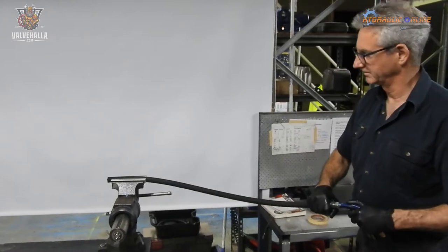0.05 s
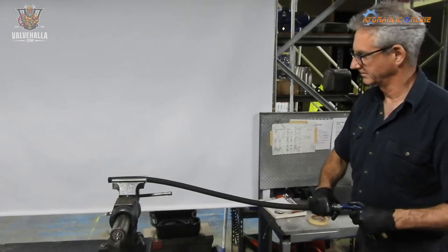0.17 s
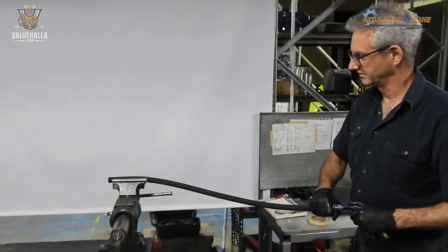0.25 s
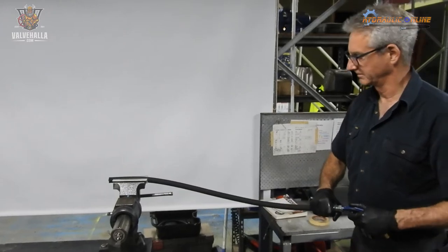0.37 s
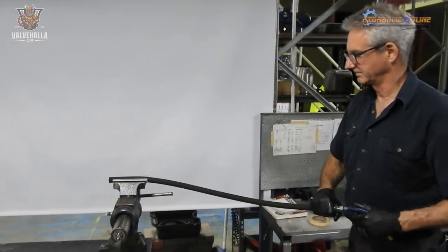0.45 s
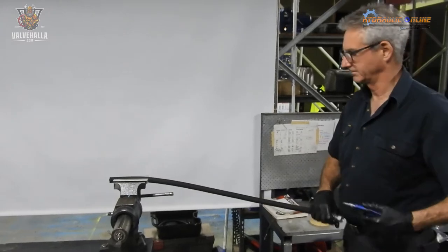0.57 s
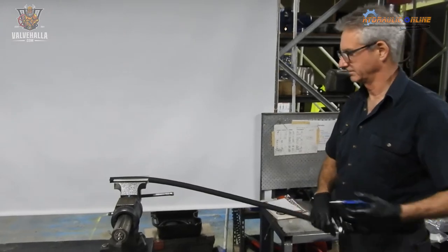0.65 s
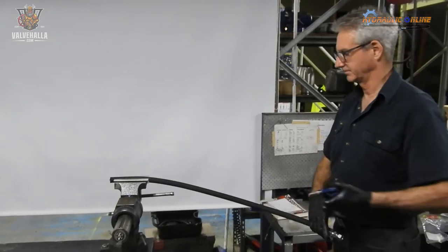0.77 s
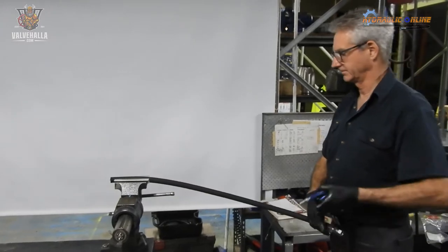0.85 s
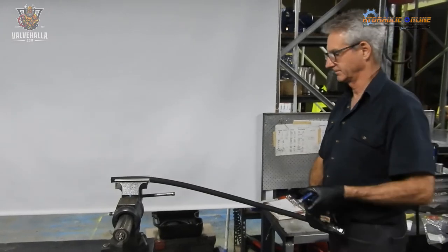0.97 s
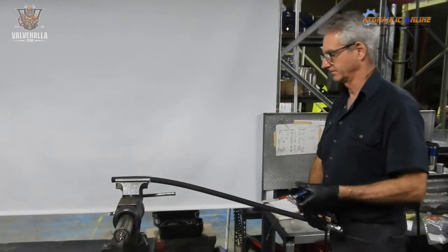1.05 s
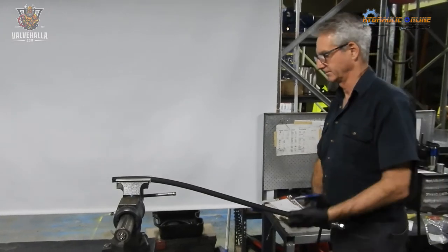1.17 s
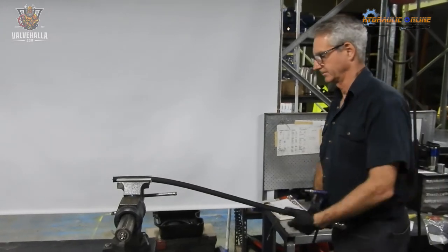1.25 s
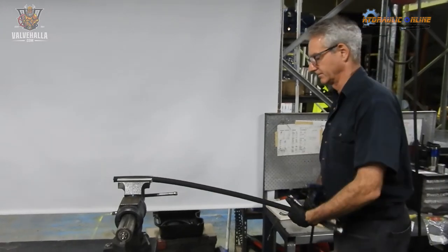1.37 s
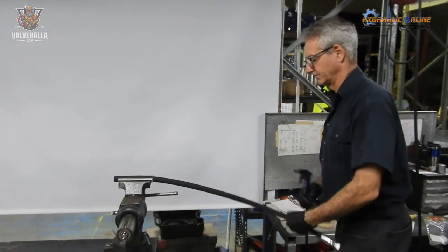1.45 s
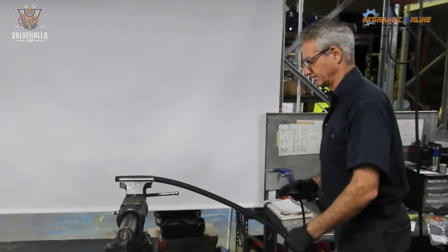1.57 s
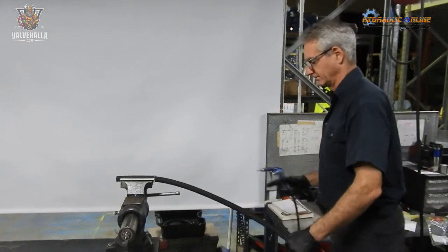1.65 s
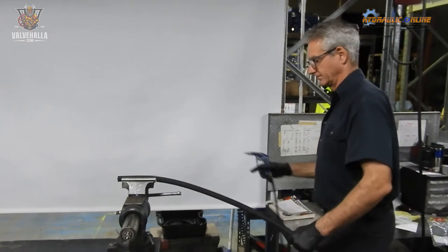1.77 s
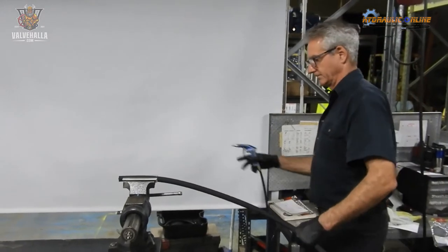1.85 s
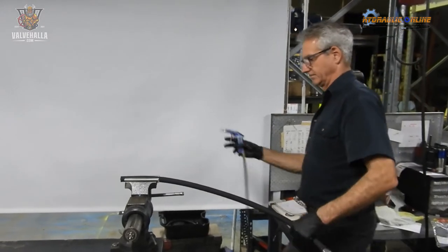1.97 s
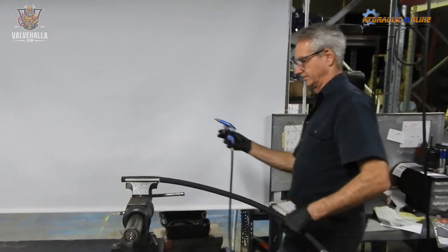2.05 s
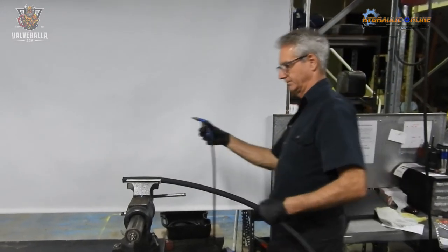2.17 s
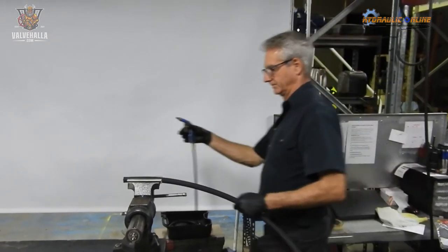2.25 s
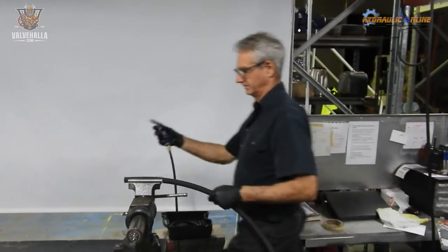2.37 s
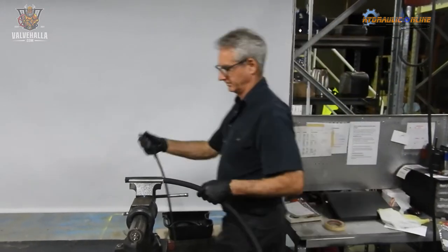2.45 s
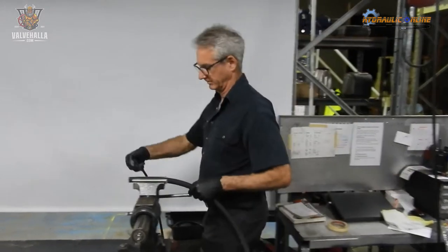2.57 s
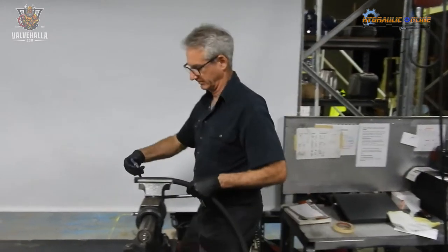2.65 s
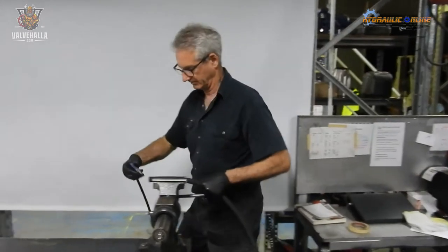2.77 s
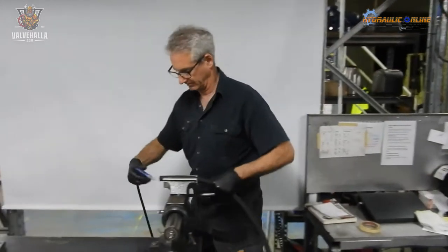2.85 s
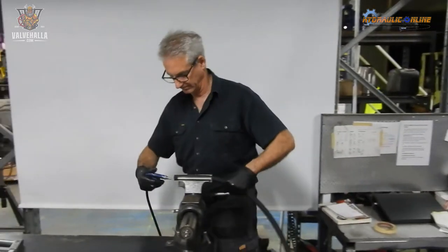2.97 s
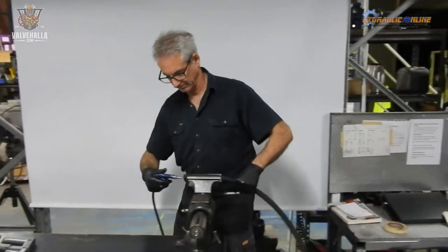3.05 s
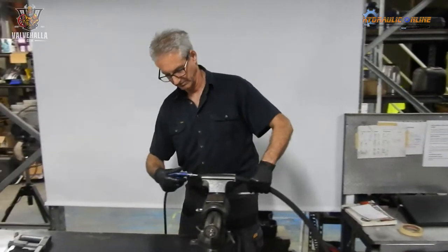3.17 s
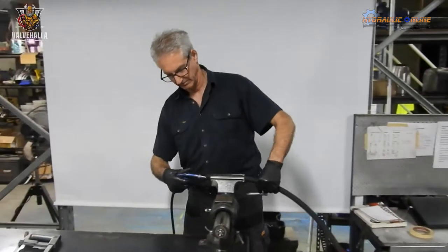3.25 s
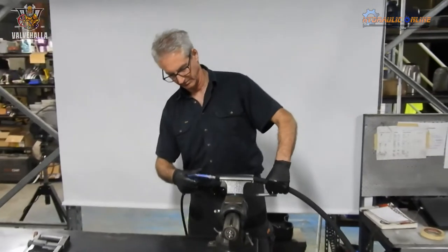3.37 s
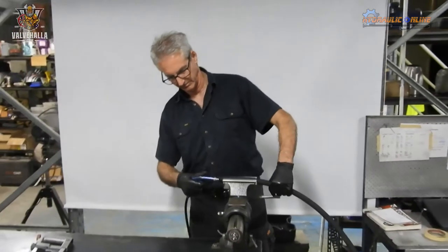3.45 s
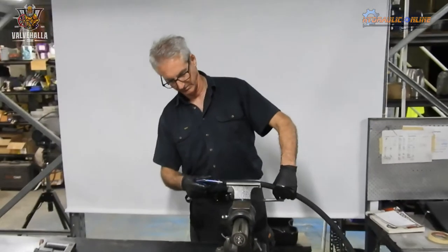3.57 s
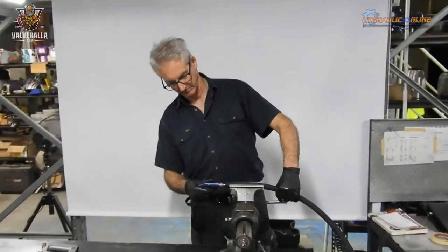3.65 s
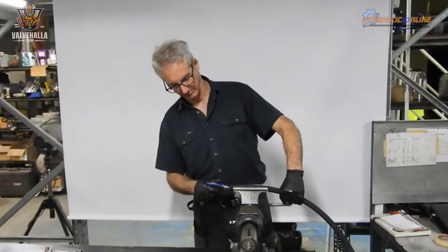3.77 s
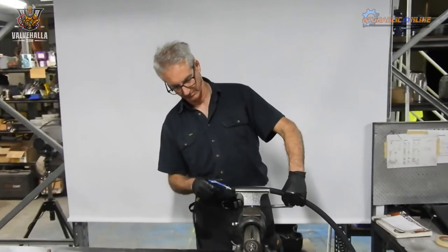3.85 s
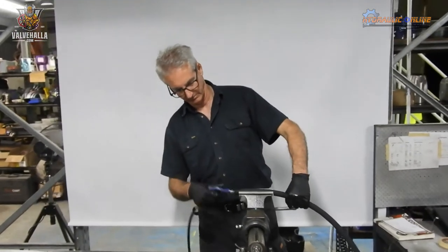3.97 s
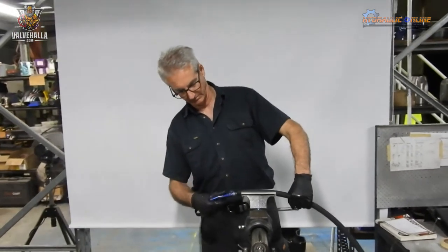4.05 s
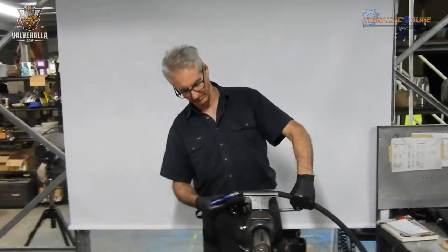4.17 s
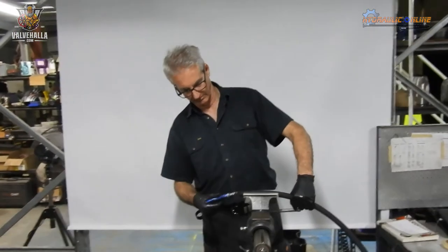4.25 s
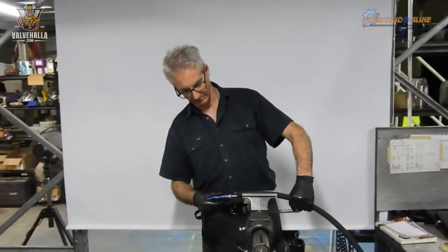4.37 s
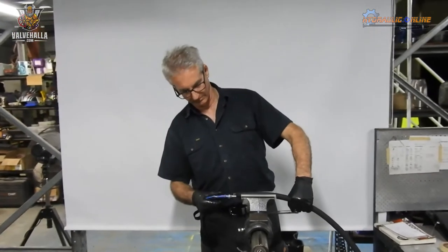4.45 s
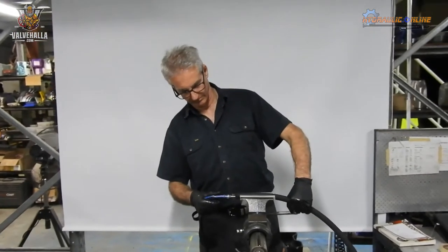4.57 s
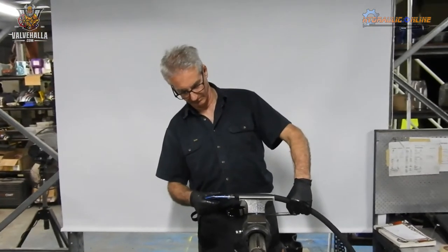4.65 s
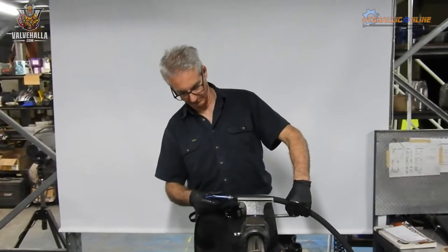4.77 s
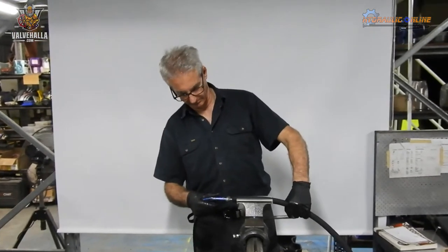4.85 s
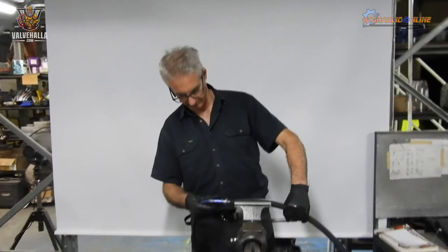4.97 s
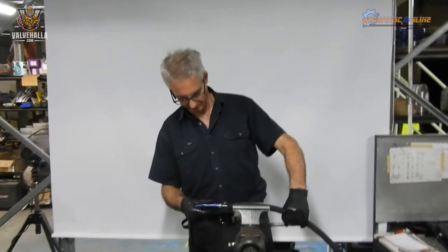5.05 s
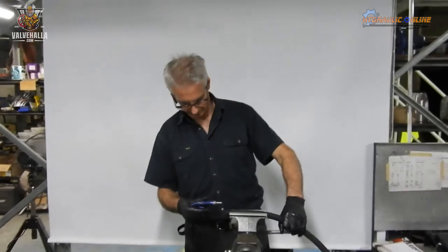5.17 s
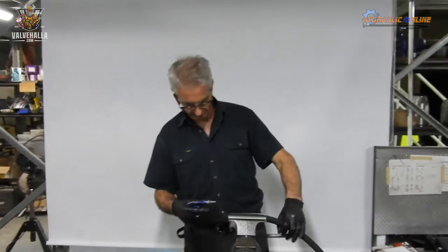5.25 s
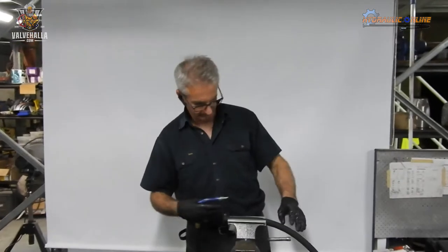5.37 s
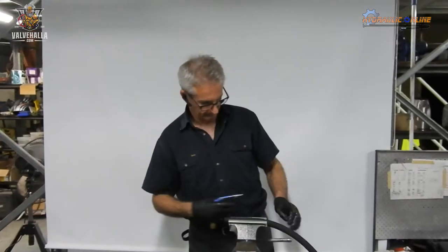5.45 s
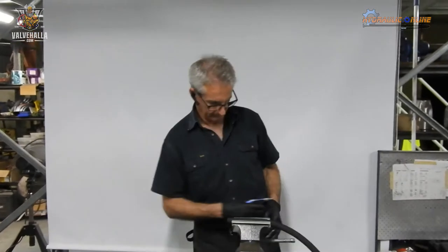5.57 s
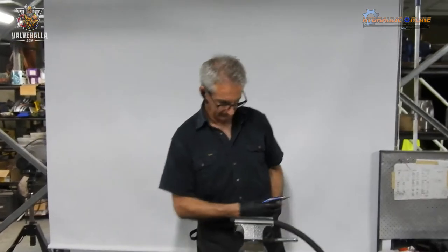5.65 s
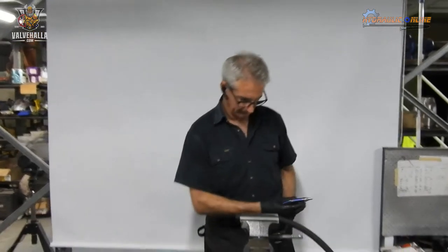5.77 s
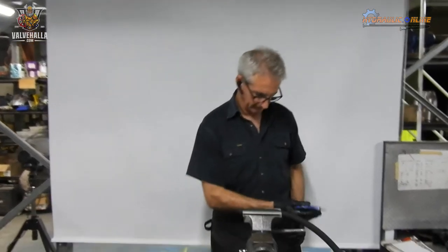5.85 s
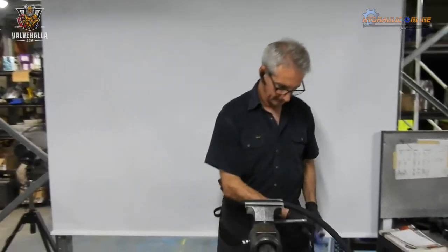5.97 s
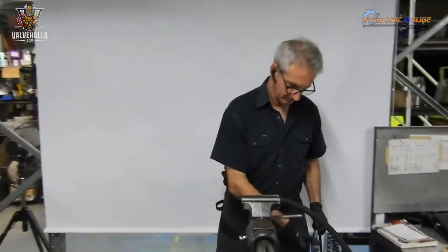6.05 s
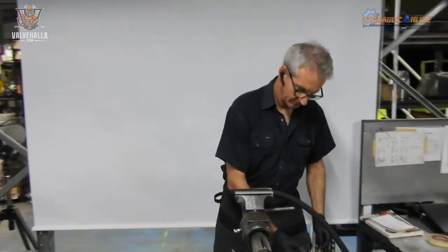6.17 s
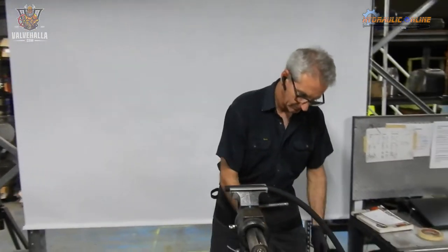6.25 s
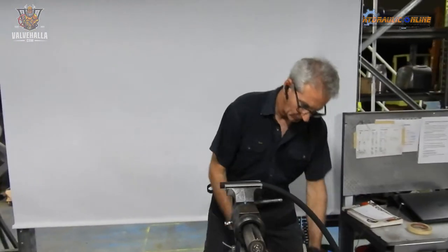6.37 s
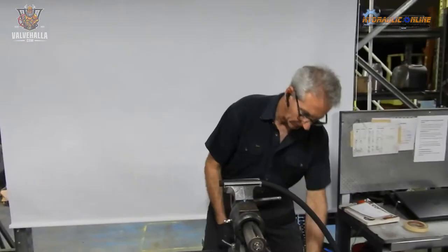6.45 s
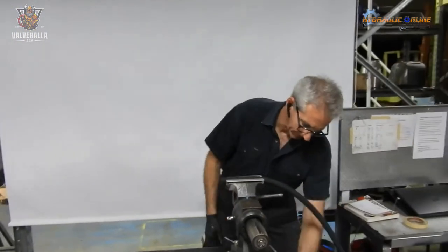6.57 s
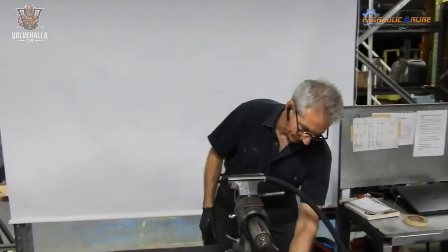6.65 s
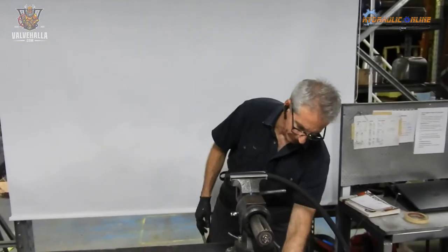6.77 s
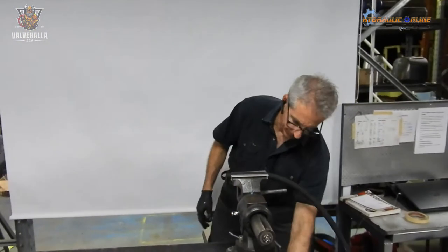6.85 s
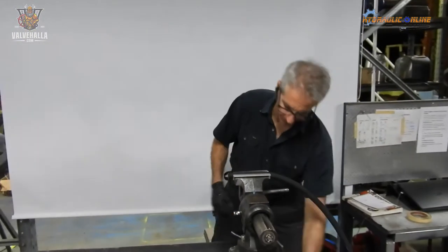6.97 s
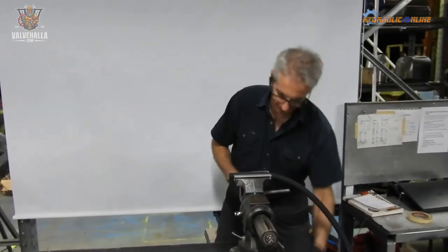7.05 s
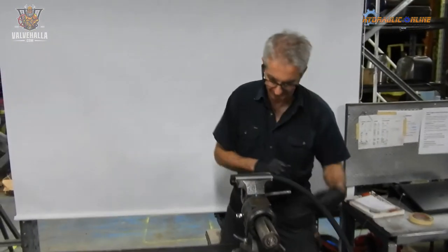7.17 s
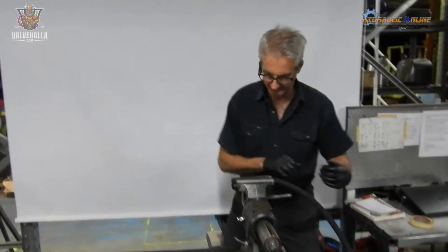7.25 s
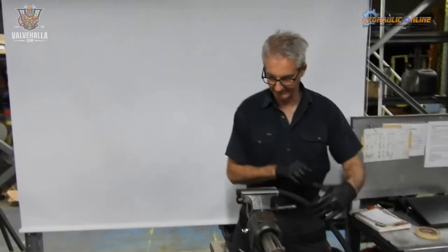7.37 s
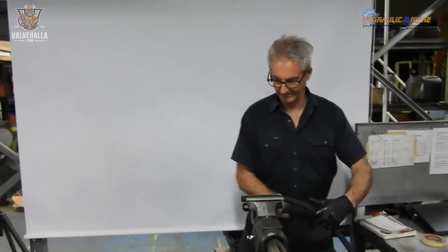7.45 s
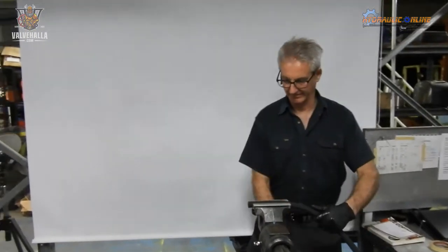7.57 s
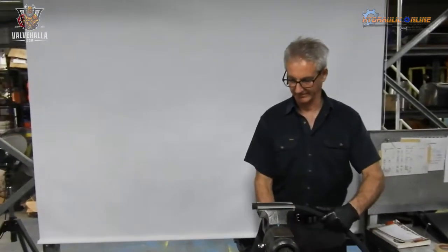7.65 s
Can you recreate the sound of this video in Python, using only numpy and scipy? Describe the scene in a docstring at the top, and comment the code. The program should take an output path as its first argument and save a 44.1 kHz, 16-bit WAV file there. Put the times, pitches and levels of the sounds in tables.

```python
"""Large workshop: a blow gun is fired in long blasts into a cut rubber hose clamped in a vice.
Shaped noise makes the jet's hiss, the ringing hose air column, the rim shriek and the off-bore buffet.
Between blasts the gun leaks and clicks (gated noise); the hose end knocks and the vice stand booms
(decaying sines), and rubber slides and scrapes (resonant noise).
Clothes rustle, feet shuffle over the hum of the hall, and decaying noise tails give its echo."""
import sys
import numpy as np
from scipy import signal
from scipy.fft import rfft, irfft, next_fast_len
from scipy.io import wavfile
from scipy.ndimage import uniform_filter1d

SR = 44100
rng = np.random.default_rng(int(sys.argv[2]) if len(sys.argv) > 2 else 0)


def log_audio(samples):
    """Write samples as a 16-bit WAV file to the path given in sys.argv[1]."""
    # one column per channel
    frames = np.atleast_2d(samples).T
    # limit to full scale, then quantise
    limited = np.clip(frames, -1, 1)
    pcm = np.round(limited * 32767).astype(np.int16)
    wavfile.write(sys.argv[1], SR, pcm)


N = 340452
T = np.arange(N) / SR
SIZE = next_fast_len(N, True)
F = np.maximum(np.fft.rfftfreq(SIZE, 1 / SR), 1)


def undb(db):
    """Decibels to gain."""
    return np.exp(np.asarray(db) * (np.log(10) / 20))


def unit(x):
    """Scale to rms 1."""
    return x / np.sqrt(np.mean(np.abs(x) ** 2))


def curves(rows):
    """Columns of a table, linearly interpolated over time."""
    t_s, *columns = np.transpose(rows)
    return [np.interp(T, t_s, c) for c in columns]


def colour(points):
    """Gain over F from (f/Hz, level/dB) points, linear in dB over log frequency."""
    hz, db = np.transpose(points)
    return undb(np.interp(np.log(F), np.log(hz), db))


def band(lo_hz, hi_hz, order=12):
    """Band-pass gain with Butterworth-shaped skirts."""
    highpass = 1 + (lo_hz / F) ** (2 * order)
    lowpass = 1 + (F / hi_hz) ** (2 * order)
    return 1 / np.sqrt(highpass * lowpass)


def resonant(bed, modes, ring_db, spread=0.45, max_q=260):
    """Broad spectrum plus resonance peaks; losses cap the Q so peaks never get whistle-thin."""
    peaks, f = np.zeros(len(F), np.float32), F.astype(np.float32)
    for hz, width_hz, db in np.float32(modes):
        damped_hz = np.hypot(width_hz, hz / max_q)
        power = np.float32(undb(2 * db) * width_hz / damped_hz)
        detune = (f - hz) / np.float32(spread * damped_hz)
        peaks += power / (1 + detune ** 2) ** 2
    return np.sqrt(unit(bed) ** 2 + peaks / peaks.mean() * undb(2 * ring_db))


# stereo width, side re mid: f/Hz, level/dB
WIDTH_POINTS = [(60, -16.5), (300, -8), (1000, -9), (2000, -8), (5000, -7), (9000, -3), (14000, -1.5)]


def noise(gain):
    """Stereo turbulence of a given spectrum, rms 1, wider in the treble."""
    draws = rng.standard_normal((2, 2 * len(F)), dtype=np.float32).view(np.complex64)
    mid, side = draws * gain.astype(np.float32)
    side = side * undb(np.interp(F, *np.transpose(WIDTH_POINTS))).astype(np.float32)
    return unit(irfft(np.array([mid + side, mid - side]), SIZE)[:, :N])


def walk(rate_hz):
    """Smooth random wander, spread near 1."""
    k = max(int(SR / rate_hz), 1)
    held = np.repeat(rng.standard_normal(N // k + 1), k)[:N]
    return 1.1 * uniform_filter1d(held, k)


def gate(start_s, length_s, t60_s, rise_s=.002):
    """Linear rise, hold, then exponential decay."""
    end_s = start_s + length_s
    opening = np.interp(T, [start_s, start_s + rise_s], [0, 1])
    return opening * undb(np.interp(T, [end_s, end_s + 3 * t60_s], [0, -180]))


def bend(x, octaves):
    """Shift all frequencies of a steady stereo sound along a curve by varying the read speed."""
    read_s = np.cumsum(2 ** octaves) / SR % T[-1]
    return np.array([np.interp(read_s, T, c) for c in x])


# blasts A, B (clamped end) and C (new aim)
# jet spectra: f/Hz, level/dB
JET_FREE_END = [(1650, -45), (2800, -18), (3090, -13), (4060, -11.5), (4870, -5), (6350, -8.5), (9010, 2.5),
                (11400, -13.5), (12700, -16.5), (14900, -34)]
JET_CLAMPED_END = [(1650, -44), (2800, -19.5), (3680, -14.5), (4200, -12.5), (4770, -10), (5520, -11),
                   (7950, -5.5), (9400, 1), (10000, -1), (11300, -13.5), (14900, -28)]
JET_NEW_AIM = [(1650, -45), (2800, -17.5), (3310, -12), (4170, -8.5), (4870, -5.5), (5220, -10), (6090, -7),
               (7890, -7.5), (9400, 3), (10700, -9.5), (14900, -26)]
# lengthwise air resonances of the hose: f/Hz, width before losses/Hz, level/dB
COLUMN_FREE_END = [(790, 44, -15), (900, 46, -21), (1199, 24, -9), (1375, 41, -4), (1530, 53, -6.5),
                   (1666, 35, -7), (1820, 67, -3.5), (2043, 54, -4.5), (2180, 30, -6), (2300, 16, -2.5),
                   (2430, 60, -6), (2630, 43, -8), (2790, 28, -16), (3010, 35, -0.5), (3180, 38, -0.5),
                   (3510, 37, 1.5), (3740, 27, -0.5)]
COLUMN_CLAMPED_END = [(679, 26, -12), (862, 26, -8), (1025, 28, -8.5), (1110, 15, -17.5), (1232, 27, -6),
                      (1416, 21, -9.5), (1581, 58, -7), (1774, 72, -6.5), (1943, 72, -5.5),
                      (2145, 41, -3.5), (2430, 40, -6), (2973, 67, -7), (3283, 36, -2), (3555, 80, -3),
                      (3780, 28, -1.5)]
COLUMN_NEW_AIM = [(506, 25, -17), (693, 33, -12), (870, 57, -9), (1018, 24, -7.5), (1200, 41, -12),
                  (1398, 30, -9), (1583, 52, -7.5), (1764, 32, -10), (1928, 36, -5.5), (2190, 91, -8),
                  (2600, 24, -6.5), (3020, 38, -5), (3550, 22, 1), (3830, 21, 0.5)]
# high resonances of bore and nozzle: f/Hz, width before losses/Hz, level/dB
BORE_FREE_END = [(6050, 33, -3.5), (6350, 27, -15), (6410, 33, -3), (6800, 27, -3.5), (7070, 39, -2.5),
                 (7350, 48, -10), (7350, 34, -4), (7560, 44, -1.5), (8230, 42, 1.5), (8740, 58, 2),
                 (9200, 47, 2), (9000, 41, -3), (9450, 36, -1), (9400, 38, -3), (9730, 25, 4),
                 (10100, 92, -8)]
BORE_CLAMPED_END = [(4100, 40, -9.5), (4120, 50, -8.5), (4340, 81, -8), (4820, 64, -10.5), (5330, 140, -7),
                    (5700, 56, -2.5), (6270, 40, -7.5), (6970, 65, -7.5), (7700, 83, -6.5),
                    (8110, 51, -5.5), (9130, 520, -2)]
BORE_NEW_AIM = [(4230, 71, -5), (4640, 35, -2), (5030, 76, -6), (5354, 110, -3), (5560, 38, 1.5),
                (5830, 40, -7), (5800, 41, -9), (6500, 52, -5), (6700, 33.5, -3), (7210, 140, -2.5),
                (7500, 33, -5), (8500, 81, -10.5), (8450, 36, 0), (9020, 81, -2), (9830, 81, 2),
                (10400, 73, -17)]
# trigger pull, opening to shutting: t/s, jet level/dB, hose ring re jet/dB
PULL_FREE_END = [(0.0, -24.5, -4.5), (0.06, -23.5, -7.5), (0.17, -23, -3.5), (0.26, -24.5, -9),
                 (0.36, -25, -9.5), (0.42, -25, -9.5), (0.49, -24, -11), (0.538, -27, -6)]
PULL_CLAMPED_END = [(3.148, -26.5, -8.5), (3.4, -26.5, -9), (3.68, -24, -7.5), (4.06, -27, -11),
                    (4.27, -23, -9), (4.43, -26.5, -11), (4.52, -32, -7.5), (4.6, -27.5, -9.5),
                    (4.64, -38.5, -6)]
PULL_NEW_AIM = [(4.668, -30.5, -11), (4.695, -25.5, -9), (4.87, -24, -10.5), (5.0, -26, -7.5),
                (5.08, -24, -8.5), (5.18, -26, -8.5), (5.225, -26, -7.5), (5.3, -32, -5.5),
                (5.35, -34.5, -10)]
# colour change as the jet grazes the rim: f/Hz, level/dB
GRAZE_POINTS = [(7300, 3), (8200, 5.5), (9100, -1), (9800, -7), (11500, 1), (15000, -5.5)]
# low roar of air spilling past the bore: f/Hz, level/dB
BUFFET_POINTS = [(80, -20.5), (160, -7.5), (220, -5.5), (320, -6), (450, -4), (700, -0.5)]
# lowest hose resonances, boomed by the buffet: f/Hz, width before losses/Hz, level/dB
BOOM_MODES = [(185.6, 45, -1.5), (247, 110, -1), (342, 75, -0.5), (589, 82, -9)]
OFF_BORE_SHARE = 1.6  # how fast hose ring turns into broad rush as the jet grazes the rim


def blast(pull, jet, column, bore, column_db, bore_db, shriek_db, spill_db, close_t60_s,
          flutter_db=0.54, waver_db=1.37, drift_octaves=.008):
    """One trigger pull: the jet drives hose, rim and buffet until the valve shuts."""
    jet_db, hose_db, rim_db, buffet_db = aim(pull, shriek_db, spill_db)
    treble = resonant(colour(jet) * band(3000, 16000), bore, bore_db)
    hiss = noise(treble * band(3810, 6880))

    # resonances drift as the nozzle covers more or less of the hose mouth
    ring = noise(resonant(F ** 0.87 * band(480, 3800), column, column_db, spread=0.38))
    ring = bend(ring, drift_octaves * walk(9))
    # grazing the rim: shriek changes colour and wavers; hose ring gives way to broad rush
    graze = np.clip((rim_db - 6) / 5, 0, 1)
    spill = np.clip(OFF_BORE_SHARE * graze, 0, 1)
    rush = noise(F ** 0.28 * band(480, 3800))
    hose = ring * np.sqrt(1 - spill) + rush * np.sqrt(spill)
    hose = hose * undb(hose_db + waver_db * walk(22.1))

    steady_rim = noise(treble * band(7150, 16000)) * np.sqrt(1 - graze)
    grazed_rim = noise(treble * band(7170, 16000) * colour(GRAZE_POINTS)) * np.sqrt(graze)
    rim = (steady_rim + grazed_rim * undb(0.75 * walk(70))) * undb(rim_db)

    buffet = noise(resonant(colour(BUFFET_POINTS) * band(150, 760, order=3), BOOM_MODES, 2.1))
    buffet = buffet * undb(buffet_db + 2.0 * walk(24))
    valve = gate(pull[0][0] - .004, pull[-1][0] - pull[0][0], close_t60_s, rise_s=0.0029)
    return (hiss + hose + rim + buffet) * undb(jet_db + flutter_db * walk(45)) * valve


# stored pressure surges as the second blast opens: holds, then dies away
SURGE_S, SURGE_HOLD_S, SURGE_FALL_S = 3.149, 0.03, 0.05
SURGE_JET_DB, SURGE_HOSE_DB, SURGE_RIM_DB, SURGE_BUFFET_DB = 8.5, 5, 4.5, 19.5
# nozzle slips off the bore and back: t/s, half length/s, change of jet/dB, rim shriek/dB, buffet/dB
BORE_SLIPS = [(3.28, 0.033, 2, 7.5, -1), (4.356, 0.03, -7, 4, 10), (4.444, 0.069, 4.5, 6, 3),
              (5.283, 0.096, -1.5, 8, 14)]


def aim(pull, rim_db, buffet_db):
    """Levels of jet, hose ring, rim shriek and buffet from trigger pull, pressure surge and slips."""
    jet_db, hose_db = curves(pull)
    surge = np.exp(-np.clip(T - SURGE_S - SURGE_HOLD_S, 0, 1) / SURGE_FALL_S) * (T > SURGE_S)
    levels = [jet_db + SURGE_JET_DB * surge, hose_db + SURGE_HOSE_DB * surge,
              rim_db + SURGE_RIM_DB * surge, buffet_db + SURGE_BUFFET_DB * surge]
    for t_s, half_s, jet, rim, buffet in BORE_SLIPS:
        if pull[0][0] < t_s < pull[-1][0]:
            levels = levels + np.outer([jet, 0, rim, buffet], swell(t_s, half_s))
    return levels


def swell(t_s, half_s):
    """Gaussian rise to 1 at t_s, and fall back."""
    return np.exp(-np.minimum(((T - t_s) / half_s) ** 2, 50))


def unsteady_aim(x, patchy_db=1.5, fine_db=2.0, size=2048):
    """Nozzle trembles in the hand: broad and narrow parts of the hiss swell and fade independently."""
    _, _, z = signal.stft(x, nperseg=size)
    broad, fine = rng.standard_normal((2, *z.shape[1:]))
    for _ in range(2):
        broad = uniform_filter1d(uniform_filter1d(broad, size=8, axis=0), size=5, axis=1)
        fine = uniform_filter1d(uniform_filter1d(fine, size=3, axis=0), size=9, axis=1)
    gain = unit(undb(patchy_db * unit(broad) + fine_db * unit(fine)))
    return signal.istft(z * gain, nperseg=size)[1][:, :N]


# leak spectrum, also used for rustles and shop air: f/Hz, level/dB
LEAK_POINTS = [(1060, -46.5), (1800, -17.5), (2900, -11.5), (3620, -7.5), (3990, -13.5), (4320, -7.5),
               (6300, -8), (9300, -1), (10800, -13), (13400, -24.5), (14900, -28.5)]
# air seeping past the valve while the gun is carried to the vice: t/s, level/dB
SEEP_LEVELS = [(2.05, -64), (2.17, -48), (2.22, -42), (2.5, -40.5), (2.82, -46.5), (2.92, -57.5)]
# gloves and clothes rustling: t/s, length/s, level/dB, rise/s
RUSTLE_EVENTS = [(1.127, 0.38, -58.5, 0.018), (1.488, 0.094, -57, 0.03), (1.613, 0.038, -52.5, 0.022),
                 (1.742, 0.25, -62, 0.059), (1.96, 0.072, -55.5, 0.04), (5.881, 0.053, -59, 0.04),
                 (5.989, 0.037, -57.5, 0.036), (6.39, 0.48, -57, 0.069), (6.85, .04, -56.5, 0.022),
                 (6.953, 0.093, -59.5, .04), (7.043, 0.38, -52.5, 0.028), (7.501, 0.026, -44, 0.026),
                 (7.58, 0.05, -38.5, .015)]
RUSTLE_T60_S = 0.42
# spurts as the trigger is touched: t/s, length/s, level/dB, t60/s
SPURT_EVENTS = [(2.951, 0.035, -38.5, 0.45), (3.121, 0.028, -29, 0.11)]
# spurt spectrum: f/Hz, level/dB
SPURT_POINTS = [(530, -36), (900, -3), (1360, -17), (1530, -4.5), (1950, -14), (2590, -3), (3860, -5),
                (9000, -4), (14900, -32)]
# clicks of gun and coupling, plus a bright edge on the hose end's tick at 2.626 s: t/s, level/dB, t60/s, centre
# f/Hz
CLICK_EVENTS = [(1.378, -32, 0.015, 9500), (1.382, -38.5, 0.059, 9600), (2.185, -33.5, .05, 9600),
                (2.484, -30.5, 0.096, 9500), (2.6263, -37.5, .018, 1990), (7.527, -40, 0.031, 8300),
                (7.533, -35, .025, 8600), (7.570, -31, 0.033, 4940), (7.629, -29, 0.023, 9200),
                (7.670, -35, .025, 8500)]
# click spectrum: f/Hz, level/dB
CLICK_POINTS = [(880, -20), (2100, 3.5), (3000, -1), (5130, -3), (9870, 4.5), (14900, -28)]


def gun():
    """Gated noise for the gun and the hands on it: weak leak, rustles, spurts and clicks, one of which
    brightens a hose-end tick."""
    seep_start_s, seep_end_s = SEEP_LEVELS[0][0], SEEP_LEVELS[-1][0]
    leak = undb(curves(SEEP_LEVELS)[0]) * gate(seep_start_s, seep_end_s - seep_start_s, .1)
    rustles = sum(undb(db) * gate(t_s, length_s, RUSTLE_T60_S, rise_s=rise_s)
                  for t_s, length_s, db, rise_s in RUSTLE_EVENTS)
    hiss = noise(colour(LEAK_POINTS) * band(2200, 16000, order=4))
    hiss = hiss * (leak + rustles) * undb(1.6 * walk(60))

    spurts = sum(undb(db) * gate(t_s, length_s, t60_s, rise_s=0.0087)
                 for t_s, length_s, db, t60_s in SPURT_EVENTS)
    clicks = 0
    for t_s, db, t60_s, hz in CLICK_EVENTS:
        click = noise(colour(CLICK_POINTS) * band(hz / 1.1, hz * 1.2, order=3))
        clicks = clicks + click * undb(db) * gate(t_s, 0, t60_s, rise_s=.001)
    return hiss + noise(colour(SPURT_POINTS)) * spurts + clicks


# hose end knocks: t/s, level/dB, bass/dB, treble edge f/Hz, t60/s, solid body/dB
KNOCK_EVENTS = [(2.626, -40, -23, 3500, 0.022, -8), (2.696, -39, -6.5, 3590, 0.09, -8),
                (6.867, -32.5, -5.5, 2000, 0.14, 0), (6.875, -35.5, 0, 2000, 0.11, 0),
                (6.917, -43.5, -4, 2200, 0.078, -4), (7.0774, -22, -0.5, 9000, 0.13, -1),
                (7.122, -41, 7, 3480, 0.16, -6)]
# clatter spectrum: f/Hz, level/dB
KNOCK_POINTS = [(100, -18.5), (210, 1.5), (330, -4.5), (470, -9.5), (600, 2), (720, -7.5), (880, 1),
                (1100, -3), (1400, -3.5), (1750, -8), (2050, -11), (2500, -14.5), (4000, -20),
                (9000, -28.5), (12000, -42)]
# bench modes: f/Hz, level/dB, t60/s
BENCH_MODES = [(193, 0, 0.29), (232, 4.5, 0.3), (335, -3, 0.32), (607, 1, 0.29), (763, -5, 0.33),
               (846, 0, 0.26), (964, -7, 0.36), (1080, -3.5, 0.38), (1250, -9, 0.28), (1430, -6.5, 0.33),
               (1615, -14.5, 0.5), (1744, -13, 0.25), (2030, -10.5, 0.35), (2239, -17, 0.4)]
# short modes of the hose end, the solid body of a knock: f/Hz, level/dB, t60/s
HOSE_END_MODES = [(896, -1, 0.076), (1066, -3.5, 0.055), (1203, -1.5, 0.06), (1410, -3.5, 0.07),
                  (2090, -9.5, 0.04)]


def knocks(ring_db=-11, bass_hz=720, rattle_db=-19, rattle_t60_s=0.4, clatter_db=-2):
    """Hose end strikes and rebounds: solid clunk in dull clatter, loose rattle, bench rings on."""
    out, age_s = np.zeros((2, N + SR)), np.arange(SR // 2) / SR
    bench_hz, mode_db, mode_t60_s = np.transpose(BENCH_MODES)[:, :, None]
    grit = noise(colour(KNOCK_POINTS))
    body = sum(undb(db - 60 * age_s / t60_s) * np.sin(2 * np.pi * hz * age_s) * (-1) ** k
               for k, (hz, db, t60_s) in enumerate(HOSE_END_MODES))
    for t_s, db, bass_db, soft_hz, t60_s, body_db in KNOCK_EVENTS:
        def contact(f):
            """A light touch drives the low modes less, a soft one the high modes."""
            return undb(bass_db / (1 + (f / bass_hz) ** 4)) / np.sqrt(1 + (f / soft_hz) ** 6)
        i = int(t_s * SR) + np.arange(len(age_s))
        spectrum = rfft(grit[:, i]) * contact(np.fft.rfftfreq(len(age_s), 1 / SR))
        fade = np.hypot(undb(-60 * age_s / t60_s), undb(rattle_db - 60 * age_s / rattle_t60_s))
        attack = np.minimum(age_s / 0.00053, 1)
        clatter = unit(irfft(spectrum, len(age_s))) * fade * attack
        decay = undb(mode_db - 60 * age_s / mode_t60_s)
        modes = contact(bench_hz) * decay * np.sin(2 * np.pi * bench_hz * age_s)
        ring = (modes * rng.choice([-1, 1], bench_hz.shape)).sum(axis=0) / 2
        strike = undb(body_db) * body + undb(clatter_db) * clatter + undb(ring_db) * ring
        out[:, i] += undb(db) * strike
    return out[:, :N]


# hose bumps the vice as it is gripped or let go: t/s, level/dB, push centre f/Hz
THUMP_EVENTS = [(2.751, -36.5, 225), (4.318, -41.5, 169), (5.205, -42, 280), (5.272, -33.5, 290),
                (7.598, -30, 359), (7.625, -27.5, 217)]
# vice stand modes: f/Hz, level/dB, t60/s
STAND_MODES = [(170, -0.5, 0.33), (204.5, -6, 0.23), (242.6, -3, 0.18), (296, -7.5, 0.14),
               (404, -3.5, 0.15)]


def thumps(push_octaves=0.59, rise_s=0.0036):
    """Vice stand booms as decaying modes; each push favours those near its own frequency."""
    out, age_s = np.zeros(N + SR), np.arange(SR // 2) / SR
    hz, mode_db, t60_s = np.transpose(STAND_MODES)[:, :, None]
    for t_s, db, push_hz in THUMP_EVENTS:
        drive = np.exp(-(np.log2(hz / push_hz) / push_octaves) ** 2)
        phase = 2 * np.pi * (hz * age_s + rng.random(hz.shape))
        modes = drive * undb(mode_db - 60 * age_s / t60_s) * np.sin(phase)
        boom = modes.sum(axis=0) * np.minimum(age_s / rise_s, 1)
        out[int(t_s * SR) + np.arange(len(age_s))] += undb(db) * boom
    return out[:N]


# hose drags in the vice: t/s, length/s, level/dB
DRAG_EVENTS = [(7.585, 0.015, -37.5), (7.605, 0.013, -48), (7.669, .008, -44.5)]
# scrape spectrum: f/Hz, level/dB
SCRAPE_POINTS = [(260, -25), (450, 5), (800, -2), (1100, -4), (1800, -2), (2700, -2), (3360, -2),
                 (3900, -7), (8000, -15), (10400, -30), (15000, -60)]
# resonances rattling in the jaws: f/Hz, width before losses/Hz, level/dB
JAW_MODES = [(1420, 36, -6), (1800, 46, 0), (2230, 39, 1.5), (2420, 23, -5), (2630, 43, -1), (2830, 47, -2),
             (3270, 78, -5)]


def drag(ring_db=0.5):
    """Rubber scrapes through the vice: gritty noise excites the jaw resonances."""
    scrape = sum(undb(db) * gate(t_s, length_s, 0.17, rise_s=0.0021)
                 for t_s, length_s, db in DRAG_EVENTS)
    return noise(resonant(colour(SCRAPE_POINTS), JAW_MODES, ring_db)) * scrape * undb(2.4 * walk(200))


# hose end slides: t/s, length/s, level/dB, starting pitch/octaves, rise/(octaves/s)
SCUFF_EVENTS = [(1.175, 0.039, -53, -0.076, 0.71), (1.251, 0.047, -55, 0.086, 0.088),
                (2.702, 0.018, -45.5, -0.038, 1.0), (2.776, 0.019, -51.5, -0.14, 0)]
# resonances of the sliding hose end: f/Hz, width before losses/Hz, level/dB
SLIDE_MODES = [(1010, 190, 1.5), (1490, 220, -8.5)]
# nozzle drawn out of the hose, one row: t/s, length/s, level/dB
WITHDRAWAL = (1.184, 0.21, -58)


def scuffs():
    """Hose end slides in short squeaks of pitch-bent resonant noise; the nozzle rasps out of it."""
    rub = noise(resonant(band(750, 1700, order=3), SLIDE_MODES, 3.5))
    strokes = 0
    for t_s, length_s, db, pitch, rise in SCUFF_EVENTS:
        squeak = bend(rub, pitch + rise * np.clip(T - t_s, 0, length_s))
        strokes = strokes + squeak * undb(db) * gate(t_s, length_s, 0.14, rise_s=.008)
    t_s, length_s, db = WITHDRAWAL
    rasp = noise(band(1500, 3900, order=3)) * undb(db) * gate(t_s, length_s, 0.06, rise_s=0.12)
    return (strokes + rasp) * undb(1.8 * walk(120))


def scattered(x, smooth_from_hz=1000, size=512, count=13):
    """Jet at the far walls: treble peaks differ by direction and together make a smooth hiss."""
    hz, _, z = signal.stft(x.mean(axis=0), fs=SR, nperseg=size)
    smooth = np.sqrt(np.abs(uniform_filter1d(np.abs(z) ** 2, size=count, axis=0)))
    hiss = unit(signal.stft(rng.standard_normal(N), nperseg=size)[2])
    mixed = np.where(hz[:, None] < smooth_from_hz, z, smooth * hiss)
    return signal.istft(mixed, nperseg=size)[1][:N]


def hall(x, far, early_db=-7, early_t60_s=0.28, late_db=-14.5, late_t60_s=0.92,
         damp_hz=10800, waver_s=0.0001955, count=14):
    """Quick returns from bench and racks, then hall ring; paths shift as the worker moves."""
    age_s = np.arange(SR) / SR
    damping = signal.butter(6, damp_hz, fs=SR, output="sos")
    wet, hop = np.zeros((2, 2 * N)), N // count + 1
    # new noise tails for each half-overlapping stretch
    for start in range(-hop, N, hop):
        early, late = rng.standard_normal((2, 2, len(age_s)))
        early = early * undb(-60 * age_s / early_t60_s) * (age_s > .004)
        early = undb(early_db) * unit(early)
        late = signal.sosfilt(damping, late) * undb(-60 * age_s / late_t60_s) * (age_s > .02)
        late = undb(late_db) * unit(late)
        i = np.arange(max(start, 0), min(start + 2 * hop, N))
        window = np.sin(np.pi * (i - start) / (2 * hop))
        for sound, tail in (x, early), (far, late):
            piece = sound[:, i].mean(axis=0) * window
            echo = signal.fftconvolve(piece[None], tail, axes=1) / np.sqrt(len(age_s))
            wet[:, i[0]:i[0] + echo.shape[1]] += echo
    # stirred air makes path lengths waver, blurring tones in the echo
    wet = np.array([np.interp(T - waver_s * walk(35), T, w[:N]) for w in wet])
    mid, side = rfft(wet, SIZE)
    # long waves reach both sides alike
    side = side * np.minimum(colour(WIDTH_POINTS) * undb(1.5), 1)
    return x + irfft(np.array([mid + side, mid - side]), SIZE)[:, :N]


# left minus right level of the work: f/Hz, level/dB
PAN_POINTS = [(100, -0.5), (600, 1.5), (3000, 0.2), (8500, 2), (13000, 1)]


def leftward(x):
    """Left channel faces the work and gets more of its treble."""
    pan_db = np.interp(F, *np.transpose(PAN_POINTS))
    return irfft(rfft(x, SIZE) * undb(np.array([pan_db, -pan_db]) / 2), SIZE)[:, :N]


# level of the shop floor's rumble, steps and shuffle; dips during the later blasts,
# then slowly climbs: t/s, level/dB
FLOOR_LEVELS = [(1.0, -67), (1.65, -62), (2.2, -56), (2.65, -51), (3.1, -51.5), (3.3, -64), (5.6, -66.5),
                (6.5, -59), (7.1, -53), (7.72, -52)]
# shop floor spectrum: f/Hz, level/dB
SHOP_POINTS = [(15, -52.5), (25, -24.5), (65, -3.5), (123, -3.5), (206, 0), (248, -10), (501, -9.5),
               (544, -8), (774, -12), (858, -10), (951, -16), (1050, -12), (1770, -15), (3500, -17),
               (4550, -46), (7700, -120)]
# machine hum within the rumble: f/Hz, width before losses/Hz, level/dB
HUM_MODES = [(76.4, 10, 5)]
RUMBLE_DB, STEPS_DB, SHUFFLE_DB = -3, 1, 1  # re FLOOR_LEVELS
HUM_DB = -79  # steady minimum of the rumble


def shop(air_db=-65):
    """Band-limited noise: low hum of the hall, shuffling steps and faint steady hiss."""
    floor_db, = curves(FLOOR_LEVELS)
    bed = colour(SHOP_POINTS)
    low = np.hypot(undb(HUM_DB), undb(floor_db + RUMBLE_DB))
    rumble = noise(resonant(bed * band(25, 126.7, order=5), HUM_MODES, 0)) * low * undb(1.24 * walk(6.1))
    steps = noise(bed * band(130, 386, order=5)) * undb(floor_db + STEPS_DB + 2.3 * walk(14))
    # the shuffle is brighter where it is louder
    bright = noise(bed * band(1000, 2800, order=5)) * undb(-3 + 0.3 * (floor_db + 51.5))
    shuffle = 0.65 * noise(bed * band(370, 1000, order=5)) + bright
    shuffle = shuffle * undb(floor_db + SHUFFLE_DB + 1.2 * walk(30))
    return rumble + steps + shuffle + undb(air_db) * noise(colour(LEAK_POINTS))


def scene():
    """Three blasts and the handling around them, echoed and panned, over the shop background."""
    first = blast(PULL_FREE_END, JET_FREE_END, COLUMN_FREE_END, BORE_FREE_END, column_db=4.5,
                  bore_db=-2.5, shriek_db=6.0, spill_db=-39.5, close_t60_s=0.21)
    second = blast(PULL_CLAMPED_END, JET_CLAMPED_END, COLUMN_CLAMPED_END, BORE_CLAMPED_END, column_db=1.0,
                   bore_db=-5.5, shriek_db=3.5, spill_db=-36.0, close_t60_s=0.22)
    third = blast(PULL_NEW_AIM, JET_NEW_AIM, COLUMN_NEW_AIM, BORE_NEW_AIM, column_db=0.0,
                  bore_db=-4, shriek_db=2.0, spill_db=-31.0, close_t60_s=0.37)
    air = undb(0.5) * unsteady_aim(first + second + third)
    handling = gun() + knocks() + scuffs() + drag() + thumps()
    return leftward(hall(air + handling, scattered(air) + handling)) + shop()


TOP_HZ = 15100


def record(dry):
    """Clip at full scale, then cut steeply above TOP_HZ."""
    lowpass = signal.ellip(10, .2, 70, TOP_HZ, fs=SR, output="sos")
    return signal.sosfilt(lowpass, np.clip(dry, -1, 1))


dry = scene()
out = record(dry)
log_audio(out)
```